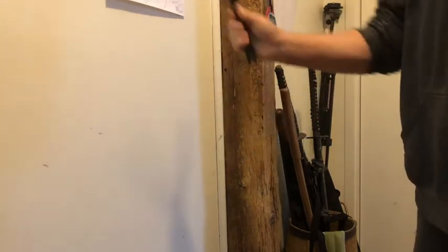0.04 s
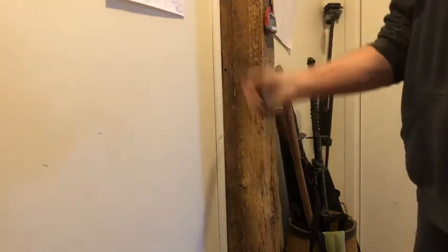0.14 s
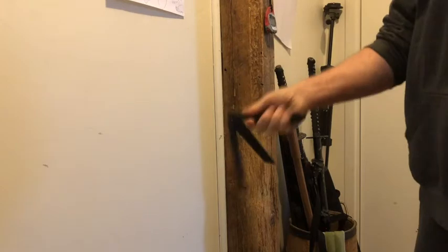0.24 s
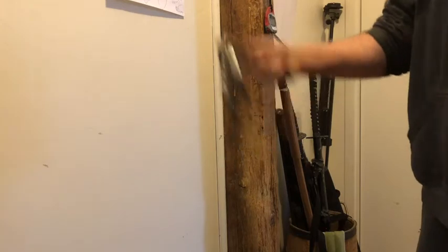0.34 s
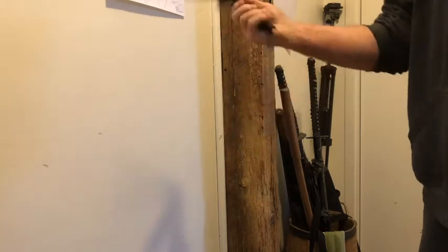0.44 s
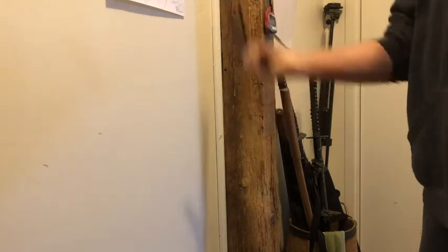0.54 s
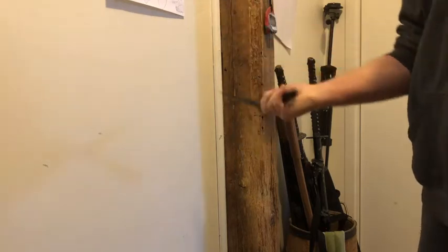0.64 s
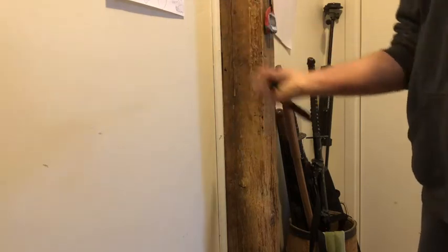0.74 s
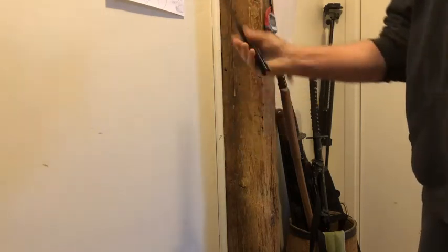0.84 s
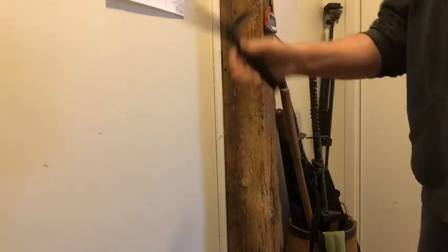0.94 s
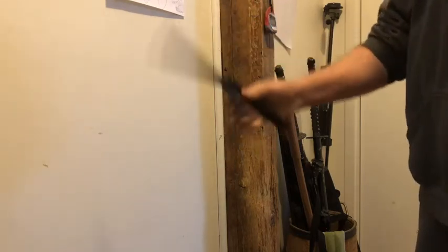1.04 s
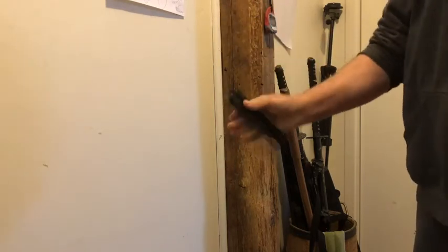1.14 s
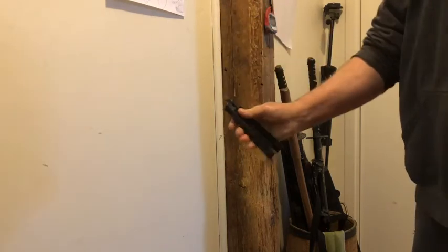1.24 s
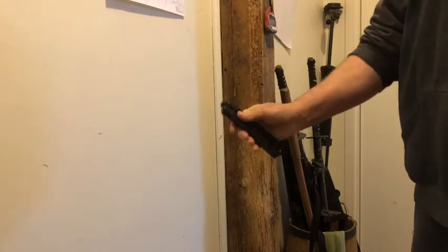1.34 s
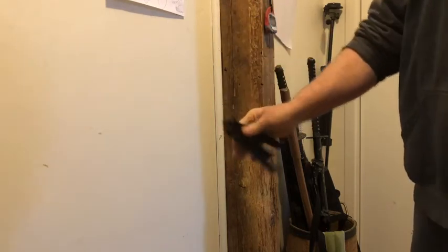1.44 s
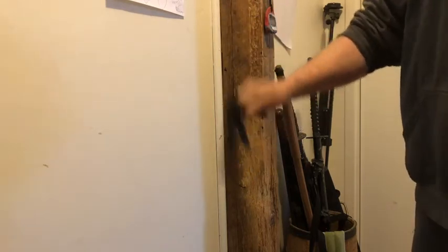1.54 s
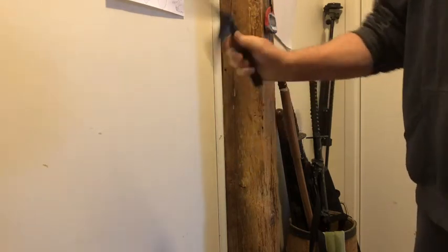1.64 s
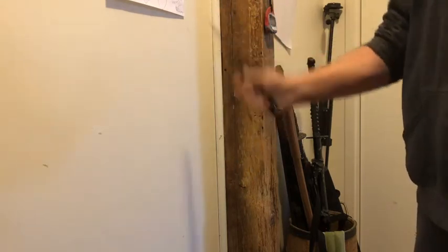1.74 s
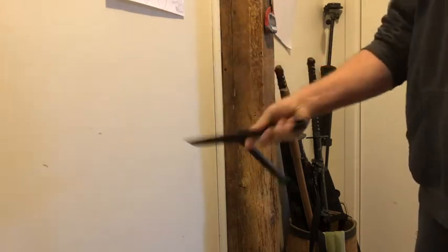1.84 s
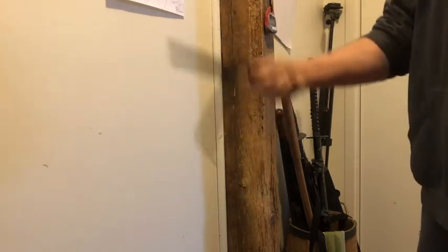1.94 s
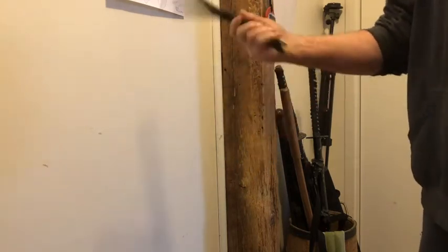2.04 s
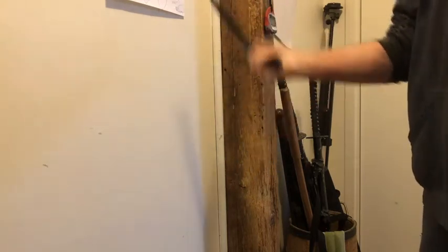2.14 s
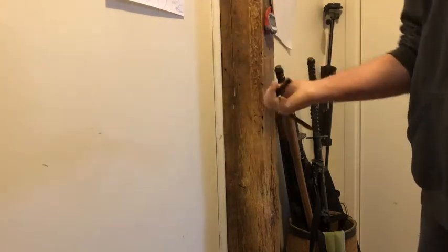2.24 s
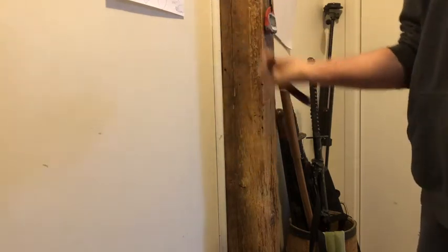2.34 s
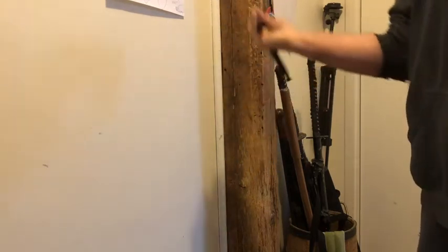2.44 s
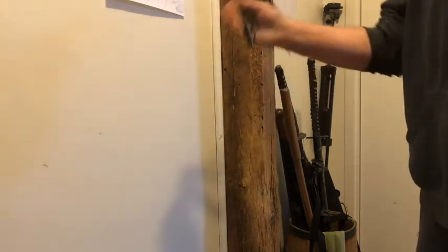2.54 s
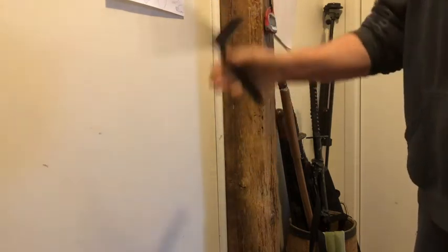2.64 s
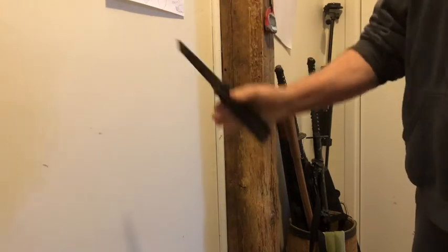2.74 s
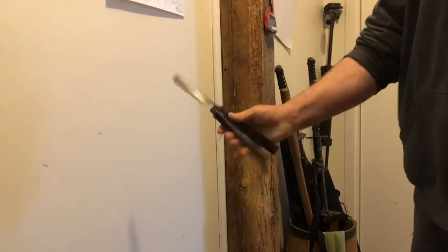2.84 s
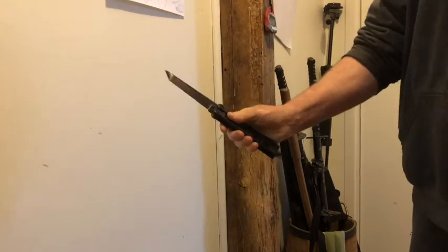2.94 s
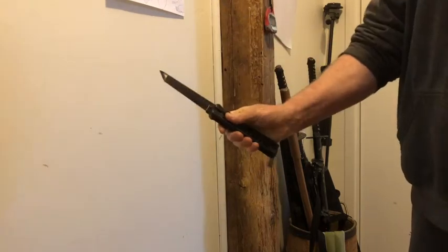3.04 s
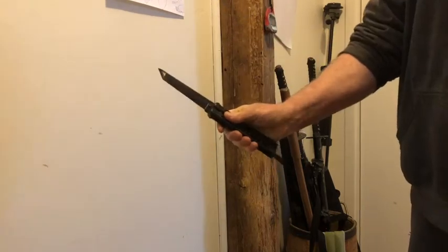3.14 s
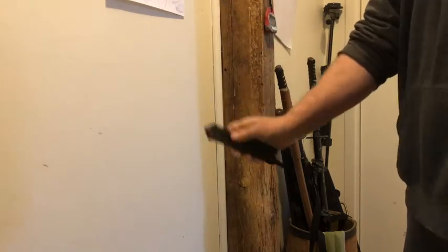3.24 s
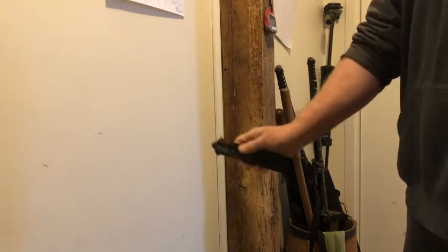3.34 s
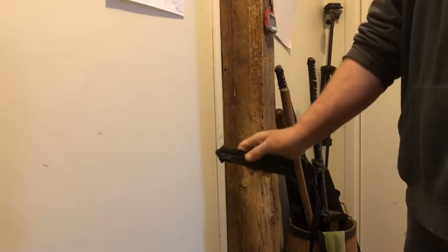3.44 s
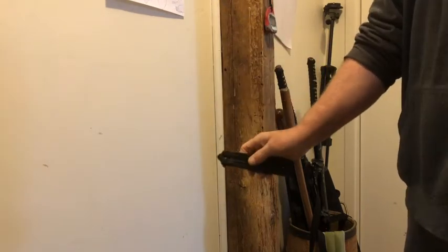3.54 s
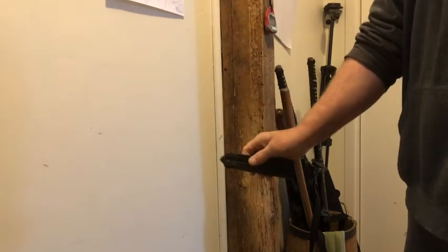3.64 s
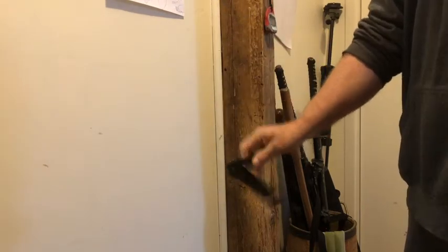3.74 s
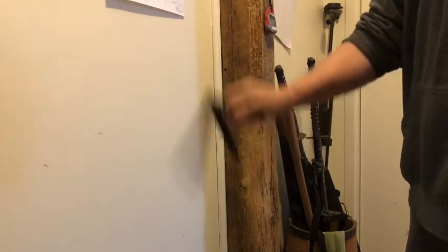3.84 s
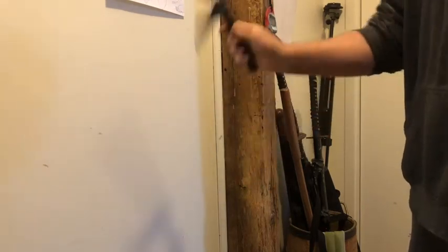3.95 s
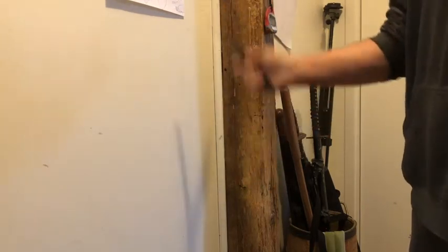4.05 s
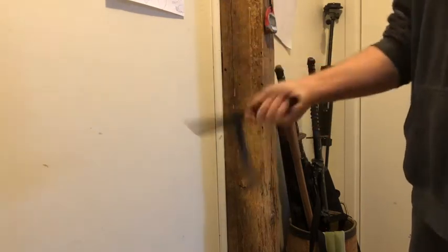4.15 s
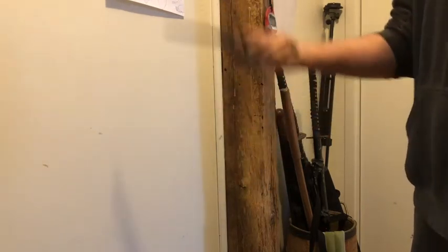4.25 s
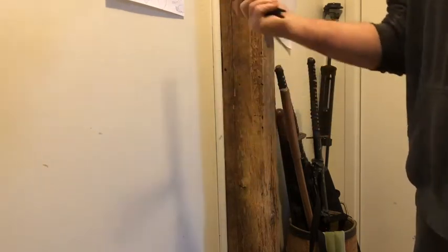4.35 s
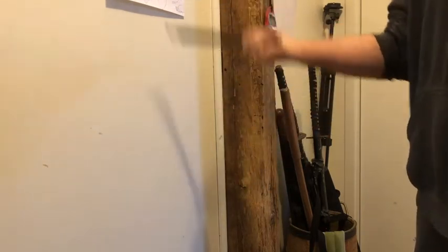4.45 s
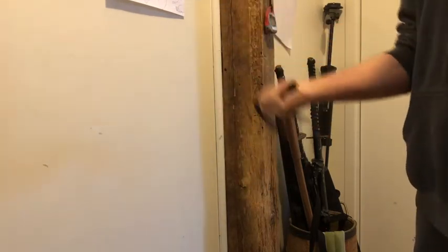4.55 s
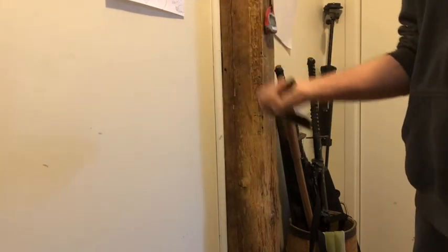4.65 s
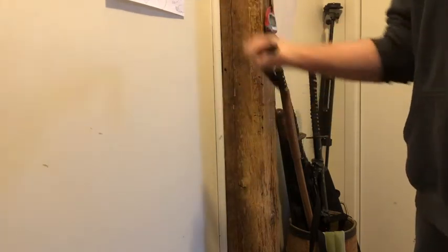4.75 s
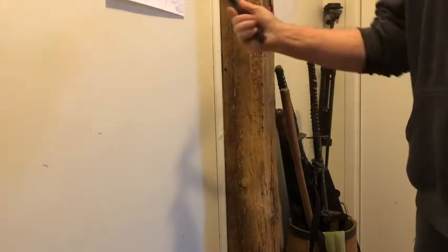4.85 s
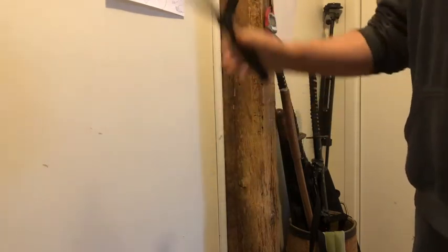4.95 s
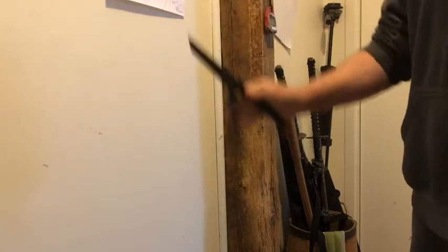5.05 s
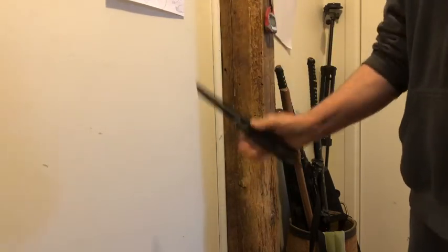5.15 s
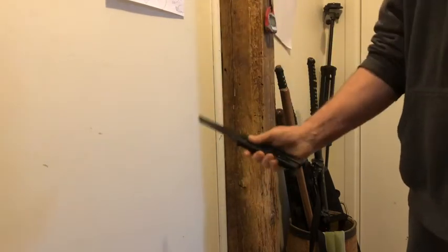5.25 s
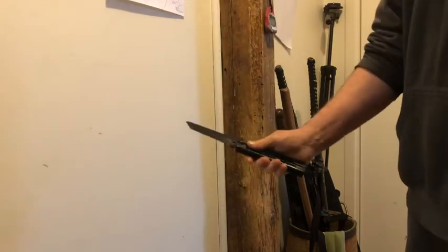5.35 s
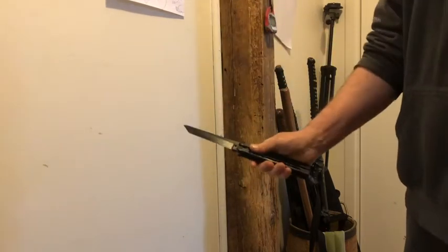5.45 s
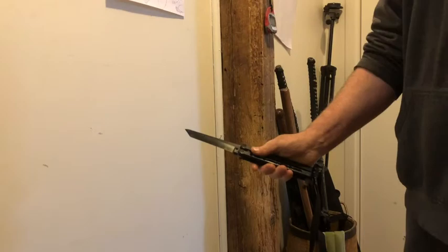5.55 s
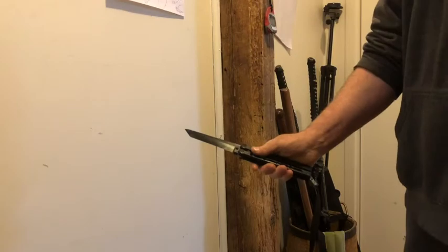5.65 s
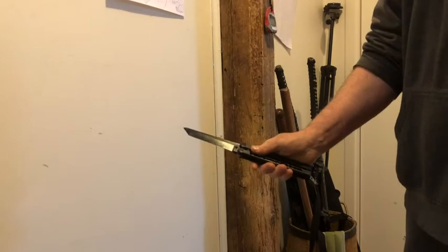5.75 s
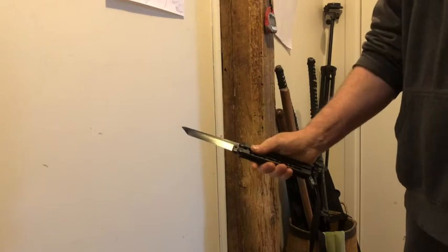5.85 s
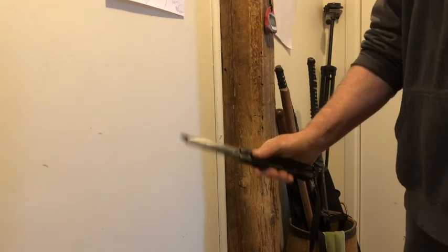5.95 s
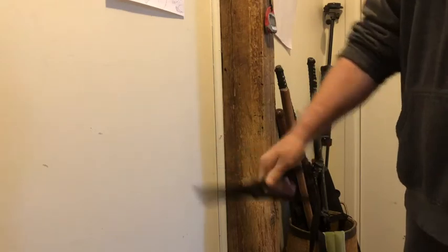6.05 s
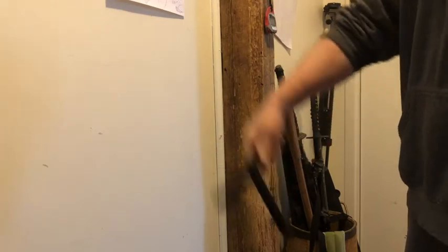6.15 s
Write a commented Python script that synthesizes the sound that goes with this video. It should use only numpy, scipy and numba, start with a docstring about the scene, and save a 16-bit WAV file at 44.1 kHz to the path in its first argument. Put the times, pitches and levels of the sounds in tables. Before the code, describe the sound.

A folding knife with two swinging handles is flipped in a small room, bright metal clacks in quick bursts between soft pivot scrapes.

```python
"""Butterfly knife tricks in a small room

Handles knock on the blade and each other: milliseconds of metal chatter (shaped noise bursts), a short
ring and some clear notes (decaying sines). Between knocks the pivots scrape, tick and sing (grainy noise
through moving resonances); hand and sleeve rustle and the palm thumps (dull noise, low sines).
Noise reflections make the room, over a quiet room tone."""
import sys
import numpy as np
from scipy import signal
from scipy.fft import rfft, irfft
from scipy.io import wavfile
from scipy.ndimage import uniform_filter1d, minimum_filter1d
from numba import njit

SR = 44100
rng = np.random.default_rng(int(sys.argv[2]) if len(sys.argv) > 2 else 0)


def output_pcm(signal):
    """Save a mono or channel-first signal as 16-bit PCM at the path in sys.argv[1].

    Samples are clipped to [-1, 1] before scaling.
    """
    pcm = np.clip(np.atleast_2d(signal).T, -1, 1) * 32767
    wavfile.write(sys.argv[1], SR, np.round(pcm).astype(np.int16))


N = 273420
TIME = np.arange(N) / SR

# Steady room noise. Each row: frequency in Hz, relative level in dB.
ROOM_TONE_COLOUR = [(15, -64), (28, -24.5), (58, -3.5), (90, -7), (160, -4), (340, -6.5), (500, -13),
                    (1000, -19), (3000, -26), (14000, -36.5), (16000, -26.5)]
# Reverberation bands. Each row: centre in Hz, t60 in seconds, level in dB.
ROOM_BANDS = [(305.5, 0.42, -1), (990, 0.3, 0.5), (2050, 0.25, -7), (4800, 0.24, -7.5), (8000, 0.16, -7),
              (14800, 0.35, -25.5)]
# Colour of the rustle. Each row: frequency in Hz, relative level in dB.
CLOTH_COLOUR = [(30, -42), (80, -7), (230, -1), (450, -4), (850, -9.5), (1400, -9.5), (2400, -15),
                (6000, -52)]
# Colour of a moving hand's rumble. Each row: frequency in Hz, relative level in dB.
RUMBLE_COLOUR = [(20, -8.5), (45, 0), (90, 3.5), (170, -1.5), (300, -10), (700, -26.5)]
# Fingers shifting their grip. Each row: start in seconds, length in seconds, level in dB before the rustle trim.
GRIP_SHIFTS = [(2.276, 0.007, -55), (2.33, 0.0095, -53.5), (2.506, 0.05, -55), (2.579, 0.11, -53.5),
               (2.874, 0.035, -65), (3.122, 0.047, -56.5), (4.614, 0.0078, -58.5)]
# Handles landing in the hand. Each row: start in seconds, level in dB before push and decay, pitch in Hz.
PALM_THUMPS = [(1.155, -38.5, 347), (1.185, -45, 440.3), (2.334, -44.5, 240), (2.514, -47, 450),
               (2.606, -41.5, 440), (3.011, -48, 238), (3.127, -46.5, 620), (4.611, -45, 490)]
# Colour of the scrape. Each row: frequency in Hz, relative level in dB.
SCRAPE_COLOUR = [(300, -40), (900, -11), (2000, -8.5), (3200, -5.5), (4600, 0.5), (6300, -5.5),
                 (7800, -4.5), (11000, -9.5), (16000, -14)]
# Swings of a handle on its pivot. Each row: fastest moment in seconds, level in dB before the scrape trim,
# speeding up in seconds, slowing down in seconds, mean resonance at full speed in Hz, its mean strength in dB.
HANDLE_SWINGS = [(0.08, -53.5, 0.11, 0.19, 3900, 2.5), (0.2, -61, 0.083, 0.21, 4450, -2),
                 (0.575, -55, 0.19, 0.3, 4250, 4), (1.0, -56, 0.18, 0.71, 3900, -12),
                 (1.71, -53, 0.21, 0.17, 7500, 3), (1.95, -63.5, 0.1, 0.22, 4620, -7.5),
                 (2.11, -57, 0.15, 0.37, 5000, -19.5), (2.231, -48.5, 0.061, 0.32, 4540, 1.5),
                 (2.588, -47, 0.02, 0.087, 4300, -28), (2.705, -47, 0.069, 0.28, 4350, -2.5),
                 (3.2, -63.5, 0.014, 0.042, 4280, 4.5), (3.316, -65.5, 0.091, 0.048, 4250, -1.5),
                 (3.84, -66.5, 0.32, 0.42, 4260, 4), (3.958, -51, 0.029, 0.046, 2940, 13.5),
                 (4.004, -53, 0.046, 0.072, 2380, 1.5), (4.109, -53.5, 0.04, 0.24, 4220, -14.5),
                 (4.43, -62.5, 0.097, 0.13, 2330, 6), (4.599, -57, 0.17, 0.33, 3950, -7),
                 (4.88, -57.5, 0.046, 0.038, 4530, -5.5), (5.02, -53.5, 0.21, 0.18, 4060, 4.5),
                 (5.22, -62.5, 0.052, 0.069, 4150, 15), (5.96, -64.5, 0.067, 0.056, 3910, 14.5),
                 (6.073, -51.5, 0.044, 0.065, 4190, -7), (6.165, -59.5, 0.055, 0.058, 5030, 0)]
# A pivot sings as the grip slides along its handle. Each row: loudest moment in seconds, swell in seconds,
# fade in seconds, mean level in dB, pitch at the loudest moment in Hz, glide in octaves per second.
PIVOT_GLIDES = [(0.19, 0.22, .14, -66.5, 2140, -2.2), (0.545, 0.13, .06, -63.5, 4170, 3),
                (1.715, 0.071, .03, -59.5, 3720, -1.6)]
# Ring of blade and handles, before each blow's scatter. Each row: mode in Hz, level in dB, t60 in seconds.
STEEL_MODES = [(1920, -4.5, 0.21), (2496, -4, 0.18), (3507, -20.5, .22), (3940, -11, 0.2), (4370, -4, .19),
               (4410, -1.5, 0.095), (4520, 5, 0.16), (5520, -6, 0.11), (6700, -8, 0.091), (7650, -14, 0.36),
               (9700, 5, 0.055), (10240, -2, .16), (11300, 0.5, .14)]
# Handle knocks. Each row: start in seconds, energy level in dB before the knock trim, body below 3 kHz in dB,
# edge above 9 kHz in dB before its common lift, strongest resonance in Hz, its lift in dB straight ahead,
# chatter scale in ms (used as at least 0.7).
HANDLE_KNOCKS = [(0.185, -29, 8, -15, 3360, 21, 3.6), (0.214, -28.5, 4, -7, 5700, 6, 1.6),
                 (0.586, -19, -1, -7, 4300, 0, 6), (0.589, -11.5, -9.5, -25, 4000, 8, 1.8),
                 (0.6008, -13, -27, -19, 3900, 12, 4.2), (0.6848, -20, -3.5, -41, 3870, 6, 0.91),
                 (0.738, -22, -4, -14, 4150, 21, 0.68), (0.8409, -27, -5.5, -16, 4100, 2.5, 6.4),
                 (1.0207, -21, -12, -10.5, 5130, 6.5, 4.1), (1.072, -12.5, -3.5, -7, 7900, 17.5, 1.5),
                 (1.0779, -0.5, -11, -10, 3500, 10.5, 2.9), (1.15, 9, -9, 1, 3900, 15.5, 0.85),
                 (1.1516, 4.5, -14, -8.5, 4570, 12.5, 2.8), (1.1595, 8, -18, 4.5, 4600, 8.5, 1.0),
                 (1.172, 0, -9, -2.5, 4300, 12, 4), (1.1815, -5.5, -10, -7, 4590, 16.5, 2.7),
                 (1.22, -6.5, -9, -12, 3970, 11, 1.9), (1.2314, -7, 0, -3, 4615, 19, 2.8),
                 (1.366, -25, -4.5, -15, 4030, 7, 1.05), (1.417, -15, -13, -13, 5750, 7.5, 1.6),
                 (1.592, -22, 0.5, -8, 5000, 14, 2.4), (1.742, -6.5, -8.5, -13.5, 4800, 4, 2),
                 (2.054, -31.5, 3, -17, 5250, 8, 4), (2.159, -26.5, 3, -12, 6800, 18.5, 2),
                 (2.3267, -4, -4.5, -8, 4900, 23, 0.63), (2.343, 1.5, -12, -0.5, 5050, 18, 1.6),
                 (2.372, 4.5, -4.5, 4.5, 10800, 5, 1.1), (2.42, -13, -25.5, -25.5, 7650, 23, 1.3),
                 (2.7073, -3, 1.5, -8.5, 4440, 14, 2.3), (2.721, 2, -4, -18, 4620, 13, 2.9),
                 (2.7275, 9.5, -27.5, -2.5, 5760, 4.5, 1.3), (2.739, 0, -8, -1.5, 5200, 6, 16),
                 (2.8689, -9.5, -10.5, -23, 8760, 18.5, 1.1), (2.8917, -11.5, 1, -35, 3630, 19, 0.57),
                 (2.9279, -2, -8.5, -6.5, 2660, 14, 0.87), (2.929, -11.5, -31, -4.5, 4450, 14.5, 0.71),
                 (3.0348, -22.5, -7.5, -17.5, 4730, 6.5, 1.1), (3.352, -15, -10.5, -10.5, 7050, 3.5, 1.4),
                 (3.575, -16.5, -10, -10, 3730, 12.5, 0.75), (3.667, -33.5, -9, -32, 3850, 15, 1.6),
                 (4.11, -5, -4.5, -11, 2530, 13, 1.56), (4.6378, -5.5, -2, -8.5, 5450, 10, 1.3),
                 (4.657, -6.5, -21, -8.5, 7460, -14.5, 3.1), (4.7134, -3, -2, 0, 7800, 24.5, 0.91),
                 (5.0221, -3.5, -4.5, -14.5, 4600, 6, 1.05), (5.025, -12, -14, -25.5, 1166, 26, 1.8),
                 (5.0877, -17, -22, -12, 7750, 14, 0.82), (5.13, -23.5, 1.5, -11, 4410, 21, 2.2),
                 (5.221, -15.5, -4.5, -9.5, 4140, 17.5, 1.8), (5.52, -33, 1.5, -29, 2305, 17.5, 1.6),
                 (5.9702, -29, -18, -30, 3743, 22, 1.3), (6.09, -4, -4, -12, 4010, 15, 0.99)]
# Notes of a handle set ringing by a knock. Each row: start in seconds, pitch in Hz, energy level in dB,
# t60 in seconds.
HANDLE_NOTES = [(1.078, 8220, -11, 0.025), (1.1519, 11300, -1, 0.021), (1.1583, 4680, -4, .09),
                (2.343, 7580, -8, 0.015), (2.372, 4610, -6, 0.018), (2.372, 7850, -4, 0.045),
                (2.372, 9650, -5, 0.032), (2.7069, 1906, -16.5, .06), (2.9279, 2450, -6.5, 0.055),
                (2.9279, 3080, -12, 0.027), (2.9279, 4560, -11, 0.058), (4.611, 1860, -27.5, 0.3),
                (4.6385, 1860, -20, .08), (4.6385, 3880, -12, 0.046), (4.6385, 5270, -14, 0.021),
                (4.6559, 7550, -11, 0.023), (4.7133, 11250, -16, 0.051), (4.7133, 1884, -36, .2),
                (6.0905, 2296, -22.5, 0.025)]


def undb(db):
    """Turn dB into an amplitude factor."""
    return 10 ** (np.asarray(db) / 20)


def unit(x):
    """Scale to an energy of one."""
    return x / np.sqrt(np.sum(x ** 2))


def fade(t, t60):
    """Exponential decay that falls 60 dB in t60 seconds."""
    return np.exp(-np.log(1000) * t / t60)


def log_interp(hz, points_hz, values):
    """Straight lines on a log-frequency axis."""
    return np.interp(np.log(hz + 1), np.log(points_hz), values)


def coloured(x, points):
    """Filter x by a (Hz, dB) curve and bring it to an rms of one."""
    db = log_interp(np.fft.rfftfreq(N, 1 / SR), *np.transpose(points))
    return unit(irfft(rfft(x) * undb(db), N)) * np.sqrt(N)


def causal(db):
    """The most compact impulse response with this gain per frequency bin (minimum phase)."""
    cepstrum = irfft(np.log(undb(db)))
    half = len(cepstrum) // 2
    cepstrum[1:half] *= 2
    cepstrum[half + 1:] = 0
    return irfft(np.exp(rfft(cepstrum)))


@njit
def resonate(x, hz, width):
    """State-variable band-pass with a moving centre, gain 1 there."""
    out, band_state, low_state = np.empty(len(x)), 0., 0.
    for i in range(len(x)):
        g, damping = np.tan(np.pi * hz[i] / SR), width / hz[i]
        band = (band_state + g * (x[i] - low_state)) / (1 + g * (g + damping))
        band_state = 2 * band - band_state
        low_state += 2 * g * band
        out[i] = damping * band
    return out


def flutter(size=600):
    """Random unevenness of a rub, smoothed over `size` samples, with a spread of one."""
    wander = uniform_filter1d(rng.standard_normal(N), size)
    return wander / wander.std()


def add(track, s, sound):
    """Mix a sound into the track from second s."""
    start = max(int(s * SR), 0)
    track[start:start + len(sound)] += sound[:max(len(track) - start, 0)]


def room_tone(level_db=-72.5):
    """Steady air of the room: coloured noise."""
    return coloured(rng.standard_normal(N), ROOM_TONE_COLOUR) * undb(level_db)


def room(x, first_s=0.0011, wall_s=0.0097, wall_db=3, wall_width_s=0.0037):
    """Dense noise reflections with a swell from the near wall; each band dies at its own rate."""
    t = np.arange(SR // 2) / SR
    hz = np.fft.rfftfreq(len(t), 1 / SR)
    centres, t60s, dbs = np.transpose(ROOM_BANDS)
    noise = rfft(rng.standard_normal(len(t)))
    near_wall = undb(wall_db * np.exp(-((t - wall_s) / wall_width_s) ** 2))
    onset = np.clip((t - first_s) / first_s, 0, 1) * near_wall
    echo = 0
    for band, t60, db in zip(np.eye(len(ROOM_BANDS)), t60s, dbs):
        reflections = irfft(noise * log_interp(hz, centres, band), len(t))
        echo = echo + undb(db) * reflections * unit(onset * fade(t, t60))
    return signal.fftconvolve(x, echo)[:N]


def after_knocks(db, t60):
    """Gain kicked up by every knock, in proportion to its table level, then dying away."""
    kicks = np.zeros(N)
    for s, knock_db, *_ in HANDLE_KNOCKS:
        kicks[int(s * SR)] += undb(knock_db + db) ** 2
    return np.sqrt(signal.lfilter([1], [1, -fade(1 / SR, t60) ** 2], kicks + 1e-24))


def gripping(attack_s=0.0027, sag_db_per_s=56.5, release_t60_s=0.14):
    """Rustle gain: each grip shift starts quickly, eases off and lets go; knocks jolt hand and sleeve too."""
    power = after_knocks(db=-76, t60=0.44) ** 2
    for s, length_s, db in GRIP_SHIFTS:
        t = np.maximum(TIME - s, 0)
        hold = np.minimum(t / attack_s, 1) * undb(db - sag_db_per_s * t)
        release = fade(np.clip(t - length_s, 0, 1), release_t60_s)
        power = power + (hold * release) ** 2
    return np.sqrt(power)


def sleeve(trim_db=-5, hollow_hz=620, width_hz=330, rumble_db=-15):
    """Cloth and skin rub in dull, grainy catches; the changing hollow of the hand makes them lumpy."""
    catches = undb(2.5 * flutter(size=110) + 3 * flutter(size=700))
    rub = coloured(rng.standard_normal(N) * catches, CLOTH_COLOUR)
    hz = hollow_hz * np.exp(.35 * flutter(size=1500))
    lumps = undb(4) * resonate(rub, hz, float(width_hz))
    rumble = undb(rumble_db) * coloured(rng.standard_normal(N), RUMBLE_COLOUR)
    return (rub + lumps + rumble) * gripping() * undb(trim_db)


def squeeze(start_s=2.7, end_s=3.1, level_db=-68, centre_hz=290, width_hz=480):
    """A low, continuous rub while the fingers close round the opened knife."""
    rub = rng.standard_normal(N)
    for _ in range(2):
        rub = resonate(rub, np.full(N, float(centre_hz)), float(width_hz))
    held = uniform_filter1d(1. * ((TIME > start_s) & (TIME < end_s)), size=1500)
    return undb(level_db) * rub / rub.std() * held


def palm(t60=0.017, push_s=0.0011):
    """Flesh takes the blow softly and gives a short, dull thump: a decaying low sine."""
    out, t = np.zeros(N), np.arange(SR // 10) / SR
    for s, db, hz in PALM_THUMPS:
        thump = np.sin(2 * np.pi * hz * t) * np.minimum(t / push_s, 1) * fade(t, t60)
        add(out, s, undb(db) * thump)
    return out


def glides(width_share=0.089):
    """Rough resonances of a turning pivot that slide up or down."""
    out, slips = np.zeros(N), rng.standard_normal(N)
    catches = undb(2.5 * flutter(size=250))
    for s, rise_s, fall_s, db, hz, octaves_per_s in PIVOT_GLIDES:
        span = (TIME > s - rise_s) & (TIME < s + fall_s)
        t = TIME[span] - s
        line = resonate(slips[span], hz * 2 ** (octaves_per_s * t), float(width_share * hz))
        swell = np.interp(t, [-rise_s, 0, fall_s], [0, 1, 0])
        out[span] += undb(db) * line / line.std() * swell
    return out * catches


def streaked(x, count=7, low_hz=2200, high_hz=10000, width_hz=150., gain=.8, drift_depth=.06):
    """Faint, unevenly spaced resonances of the handles come and go and glide as the pivots turn."""
    out = x
    for hz in np.exp(rng.uniform(np.log(low_hz), np.log(high_hz), count)):
        drift = uniform_filter1d(flutter(size=9000), size=2000)
        swell = np.clip(1 + flutter(size=4000), 0, 2)
        out = out + gain * swell * resonate(x, hz * np.exp(drift_depth * drift), width_hz)
    return out / out.std()


def swinging(drop_db=22.5, crest_shape=1.62, sag_octaves_per_db=0.02):
    """(samples, gain, resonance Hz, its dB) of rebounds and swings: level and pitch follow the handle's speed."""
    # after each knock a handle scrapes on
    moves = [(TIME >= 0, after_knocks(db=-52, t60=0.25), 4120, 0.5)]
    for s, db, rise_s, fall_s, hz, resonance_db in HANDLE_SWINGS:
        away = np.maximum((s - TIME) / rise_s, (TIME - s) / fall_s)
        span = away < 2
        # drop_db is reached one rise time before or one fall time after the fastest moment
        slowed_db = drop_db * away[span] ** crest_shape
        sinking_hz = hz * 2 ** (-sag_octaves_per_db * slowed_db)
        moves.append((span, undb(db - slowed_db), sinking_hz, resonance_db))
    return moves


def ticks(count=90, middle_db=13, spread_db=3):
    """Play in the loose pivots: light knocks at random moments, one colour for all."""
    out = np.zeros(N)
    for when, size in rng.random((count, 2)):
        tick = knock(chatter(1.5), body_db=-7, edge_db=-5.5, peak_hz=4600, lift_db=-0.5)
        add(out, when * N / SR, undb(middle_db + spread_db * (2 * size - 1)) * tick)
    return out


def pivots(grain_db=2.5, trim_db=-5.0, overtone_db=-4, overtone_ratio=2.1, width_hz=400, catch_db=3):
    """Dense tiny slips of uneven size in the turning pivots, through a handle resonance and its overtone."""
    # each slip size is held for 30 samples
    sizes_db = grain_db * np.repeat(rng.standard_normal(N // 30 + 1), 30)[:N]
    scrape = streaked(coloured(rng.standard_normal(N) * undb(sizes_db), SCRAPE_COLOUR))
    # the contact point creeps, so the resonance wanders and catches
    wander = np.exp(.018 * flutter(size=2500))
    catches = undb(catch_db * flutter())
    power, singing = np.zeros(N), np.zeros(N)
    for span, gain, hz, resonance_db in swinging():
        centre = hz * wander[span]
        resonance = undb(resonance_db) * resonate(scrape[span], centre, float(width_hz))
        overtone = undb(overtone_db) * resonate(scrape[span], overtone_ratio * centre, 2. * width_hz)
        singing[span] += gain * (resonance + overtone)
        power[span] += gain ** 2
    speed_gain = np.sqrt(power)
    drag = undb(1.1 * flutter(size=1100))
    rubbing = undb(trim_db) * drag * (scrape * speed_gain + catches * singing)
    return rubbing + ticks() * speed_gain


def even(x, size=64):
    """Level out the broad humps of a burst's spectrum and keep its fine ripple."""
    humps_db = 10 * np.log10(uniform_filter1d(np.abs(rfft(x)) ** 2, size) + 1e-6)
    return signal.fftconvolve(x, causal(-humps_db))[:len(x)]


def chatter(length_ms, size=1024):
    """Metal faces touch many times in a few milliseconds, in uneven bounces, ever more lightly."""
    t = np.arange(size) / SR
    span = max(length_ms, .7) / 1000
    bounces = undb(2.2 * np.repeat(rng.standard_normal(size // 16), 16))
    envelope = np.minimum(t / 0.00078, 1) * np.exp(-(t / (1.99 * span)) ** 1.1)
    return even(rng.standard_normal(size) * bounces * envelope)


def knock(contacts, body_db, edge_db, peak_hz, lift_db, sharpness=9.7, overtone_share=0.4, overtone_ratio=1.85):
    """Where the faces meet sets the colour and which damped resonance stands out, with its weaker overtone."""
    hz = np.fft.rfftfreq(len(contacts), 1 / SR)
    steel_hz = [90, 350, 1050, 1900, 3300, 11500, 16000]
    steel = log_interp(hz, steel_hz, [-38.5, -16, -12, 2.0, 0.0, -1.0, -7.5])
    body = body_db * log_interp(hz, [2200, 3500], [1, 0])
    # every edge gets a common 6 dB lift
    edge = (edge_db + 6.0) * log_interp(hz, [5500, 11000, 16000], [0, 1, 1.3])
    # sharpness is centre over the half-width at half the dB lift
    resonance = 1 / (1 + (sharpness * (hz / peak_hz - 1)) ** 2)
    overtone = overtone_share / (1 + (sharpness * (hz / (overtone_ratio * peak_hz) - 1)) ** 2)
    colour_db = steel + body + edge + lift_db * (resonance + overtone)
    return unit(signal.fftconvolve(contacts, causal(colour_db)))


def ring(blow, jitter=0.0085):
    """The steel rings on after a blow; the grip shifts and weights its modes anew each time."""
    t = np.arange(SR // 5) / SR
    hz, db, t60 = np.transpose(STEEL_MODES)[:, :, None]
    detune, weight = rng.standard_normal((2, len(hz), 1))
    tones = np.sin(2 * np.pi * hz * (1 + jitter * detune) * t)
    modes = undb(db + 2 * weight) * tones * fade(t, t60)
    return unit(signal.fftconvolve(blow, modes.sum(axis=0)))


def note(hz, t60, attack_s=0.00075):
    """One clear mode of a handle, built up while the faces chatter, with an energy of one."""
    t = np.arange(SR // 4) / SR
    return unit(np.sin(2 * np.pi * hz * t) * np.minimum(t / attack_s, 1) * fade(t, t60))


def dispersed(x, delay_s=0.0098, half_delay_hz=617.2):
    """Bending waves in the steel carry the bass slowly, so it comes last, as a quick downward chirp."""
    hz = np.fft.rfftfreq(2 * N, 1 / SR)
    # the delay is delay_s at the very bottom and has halved at half_delay_hz
    phase = 2 * np.pi * delay_s * half_delay_hz * np.arctan(hz / half_delay_hz)
    return irfft(rfft(x, 2 * N) * np.exp(-1j * phase))[:N]


def handles(trim_db=-1.5, ring_db=-20, wall_db=2.5, note_wall_db=-3, places=7):
    """Knocks, rings and notes; the knife moves, so successive knocks meet the room from different places."""
    direct, thrown = np.zeros(N), np.zeros((places, N))
    for k, (s, db, body_db, edge_db, peak_hz, lift_db, chatter_ms) in enumerate(HANDLE_KNOCKS):
        contacts = chatter(chatter_ms)
        ringing = undb(ring_db) * ring(knock(contacts, body_db, edge_db, peak_hz, 0))
        # the resonance beams at the microphone; the walls get a smaller, broader lift
        paths = [(direct, 0, 1, 9.7), (thrown[k % places], wall_db, 0.81, 7.5)]
        for track, path_db, lift_share, sharpness in paths:
            gain = undb(db + trim_db + path_db)
            hit = knock(contacts, body_db, edge_db, peak_hz, lift_share * lift_db, sharpness)
            add(track, s, gain * ringing)
            add(track, s, gain * hit)
    for k, (s, hz, db, t60) in enumerate(HANDLE_NOTES):
        sung = undb(db) * note(hz, t60)
        add(direct, s, sung)
        add(thrown[k % places], s, undb(note_wall_db) * sung)
    return dispersed(direct + sum(room(place) for place in thrown))


def scene(sleeve_room_db=-7):
    """Knife, hand and sleeve in the room, over its steady noise."""
    background = room_tone()
    rustle = sleeve() + squeeze() + palm()
    scrape = pivots() + glides()
    reflected = room(scrape + undb(sleeve_room_db) * rustle)
    return (handles() + scrape + rustle + reflected + background)[None]


def record(dry, size=50, ceiling=.4, bottom_hz=38, top_hz=15750):
    """A limiter ducks around the hardest peaks; the deep bass and the top are cut."""
    needed = np.minimum(1, ceiling / (np.abs(dry) + 1e-9))
    # hold the lowest gain around each peak, then smooth it
    limited = dry * uniform_filter1d(minimum_filter1d(needed, 2 * size), size)
    thin = signal.sosfilt(signal.butter(4, bottom_hz, "high", fs=SR, output="sos"), limited)
    return signal.sosfilt(signal.ellip(10, .2, 70, top_hz, fs=SR, output="sos"), thin)


dry = scene()
out = record(dry)
output_pcm(out)
```